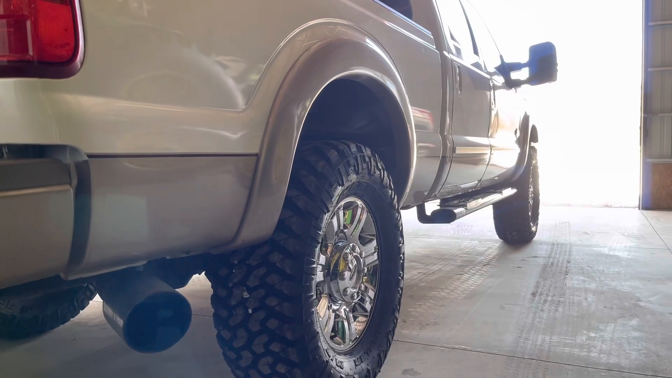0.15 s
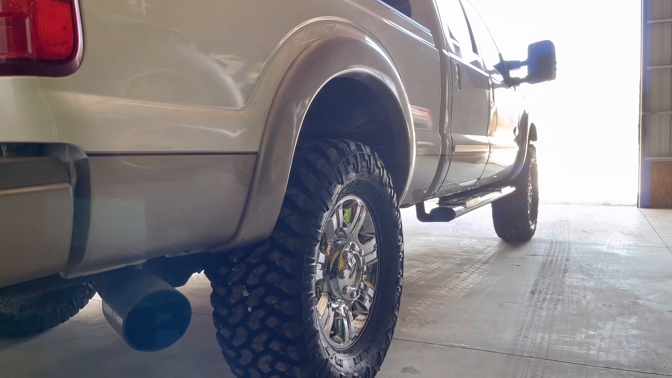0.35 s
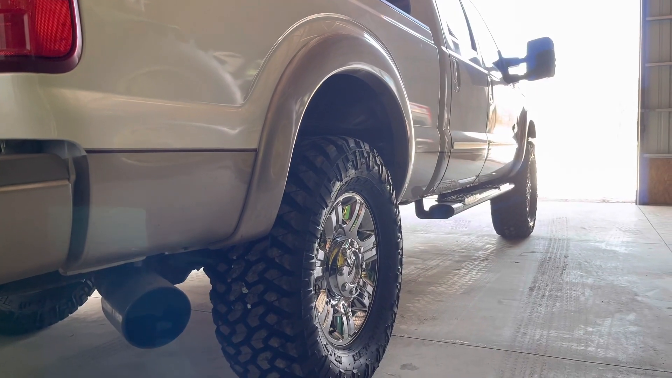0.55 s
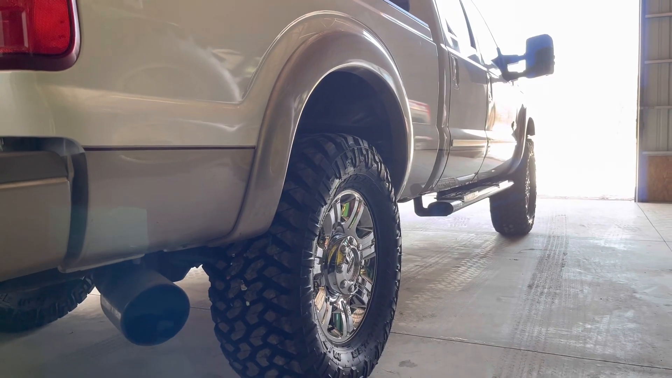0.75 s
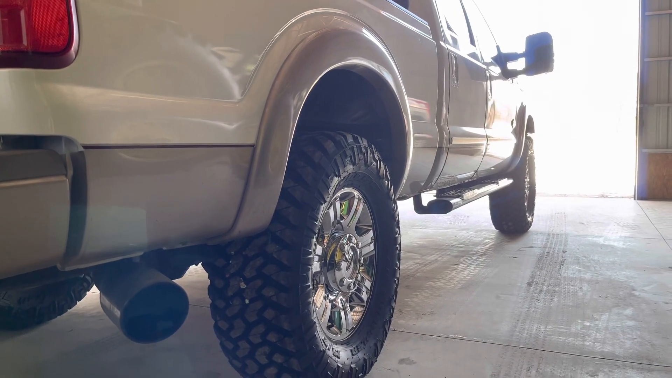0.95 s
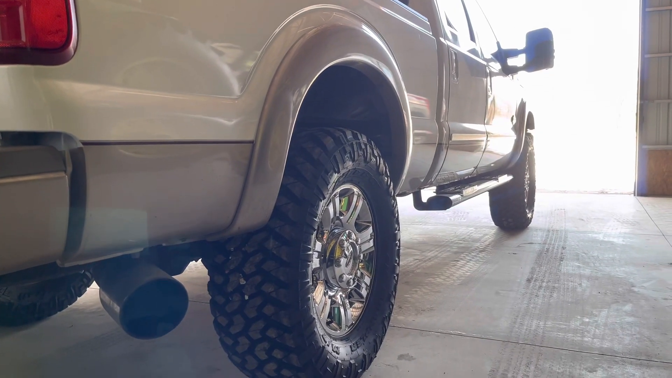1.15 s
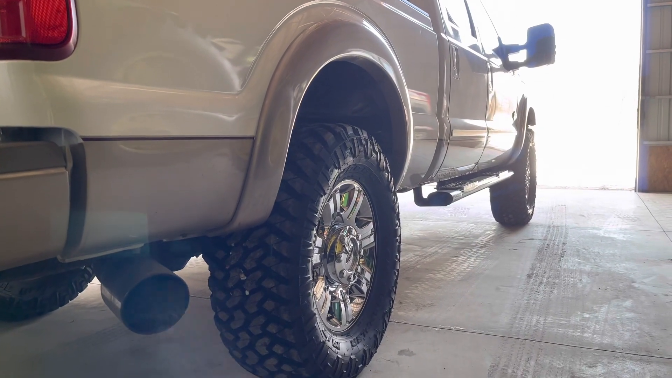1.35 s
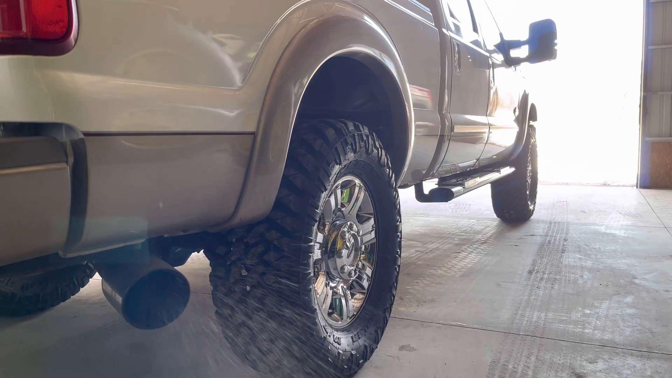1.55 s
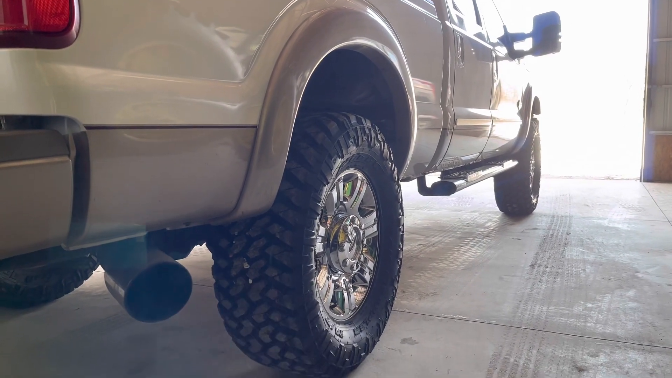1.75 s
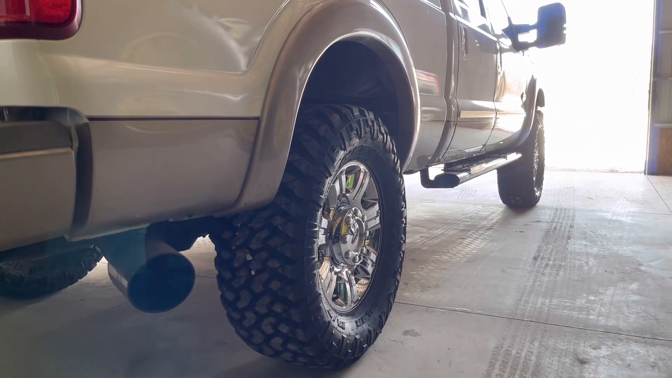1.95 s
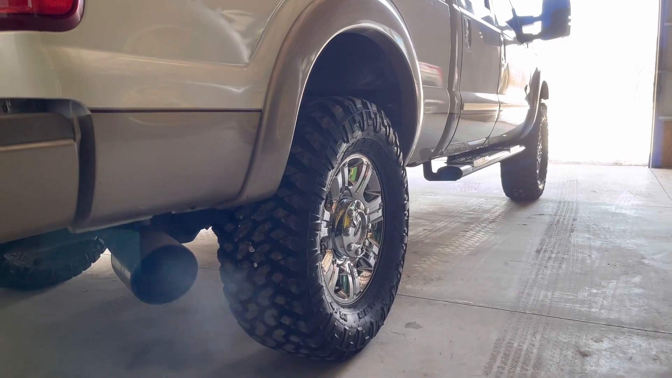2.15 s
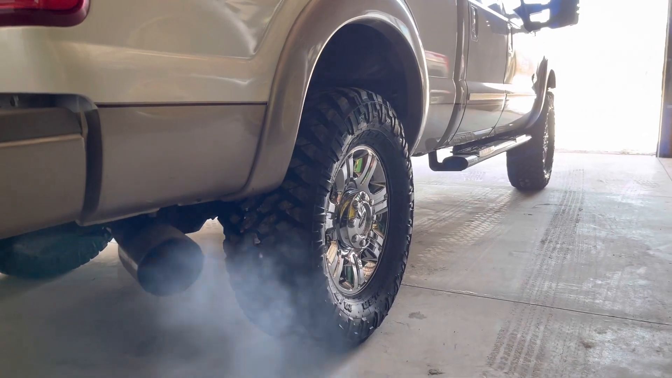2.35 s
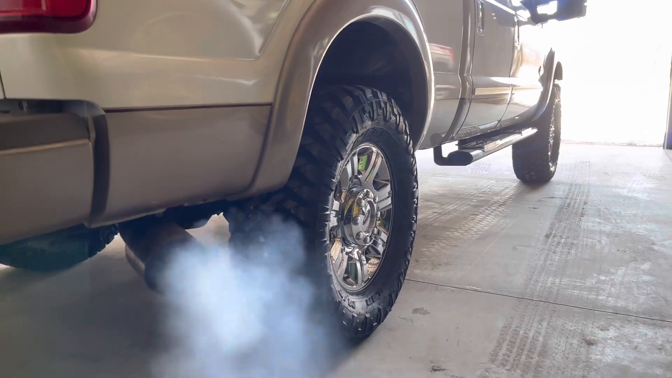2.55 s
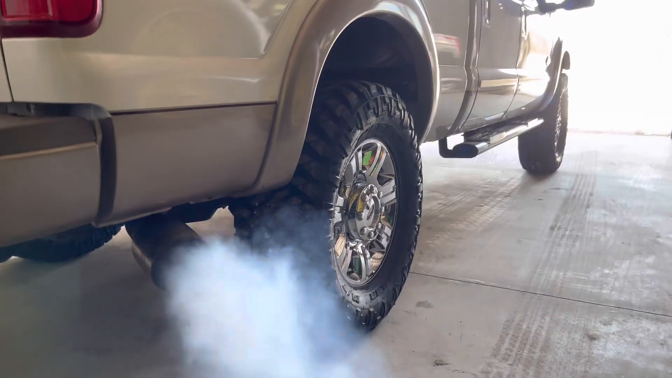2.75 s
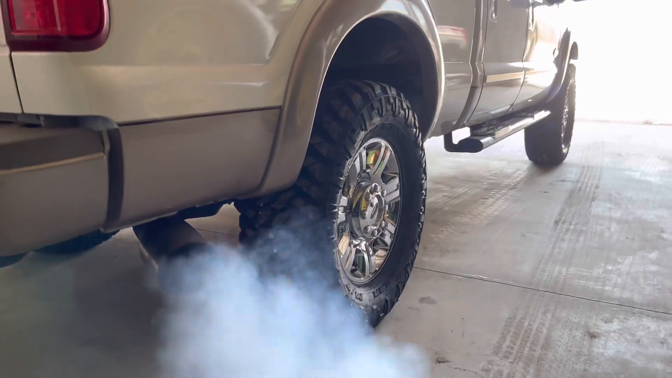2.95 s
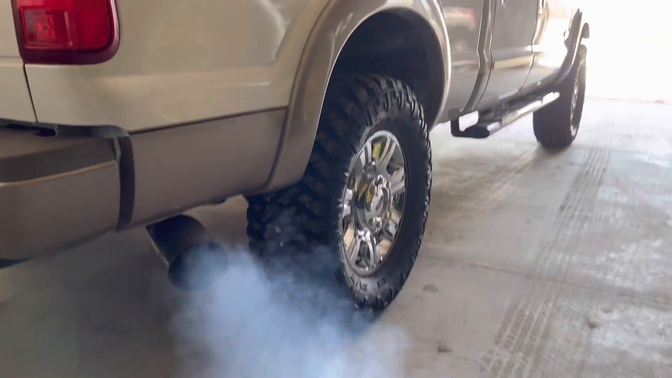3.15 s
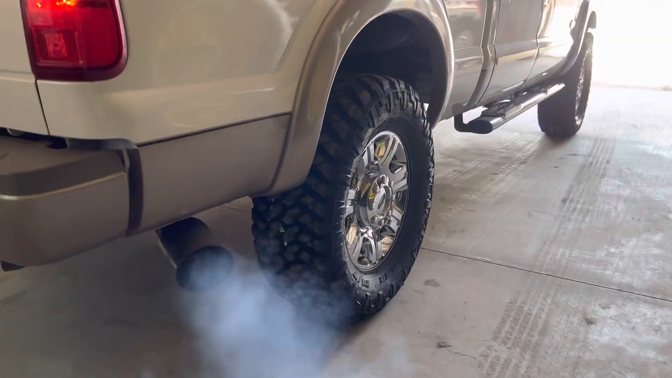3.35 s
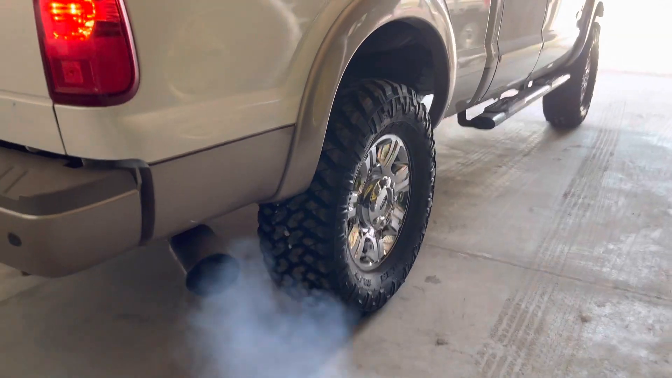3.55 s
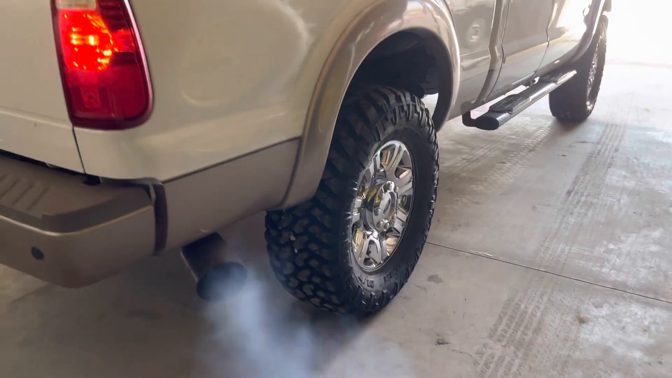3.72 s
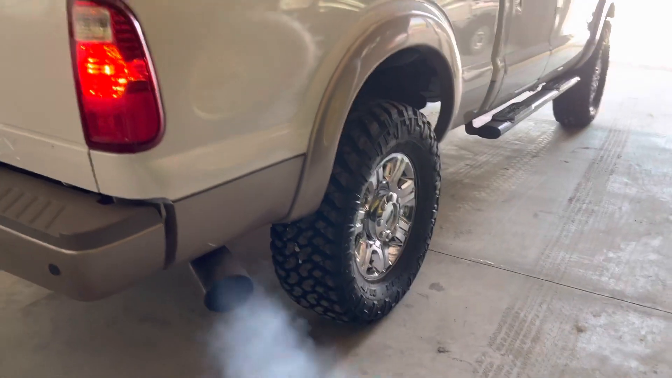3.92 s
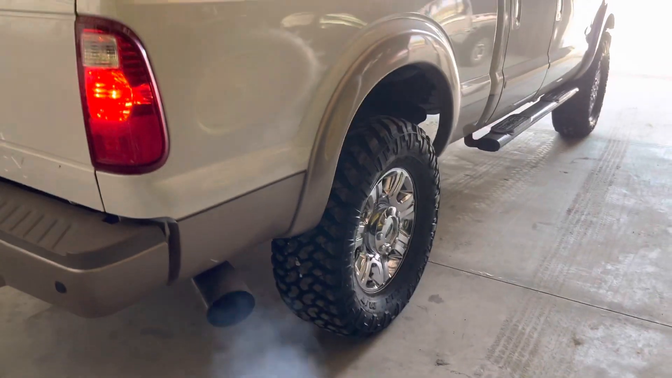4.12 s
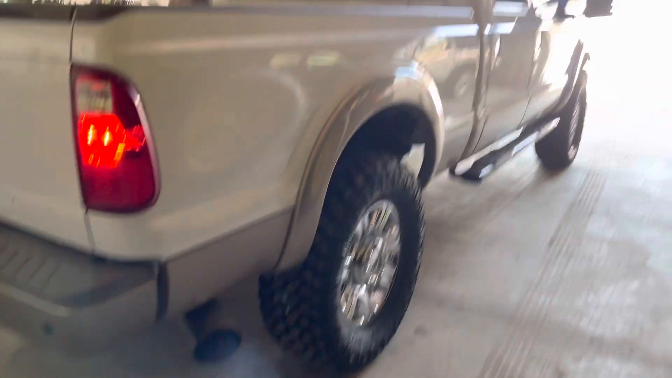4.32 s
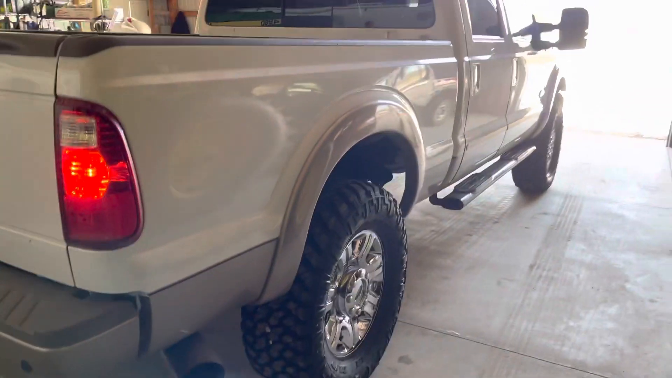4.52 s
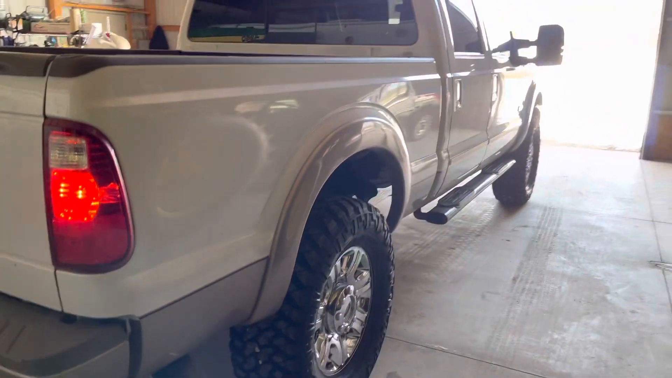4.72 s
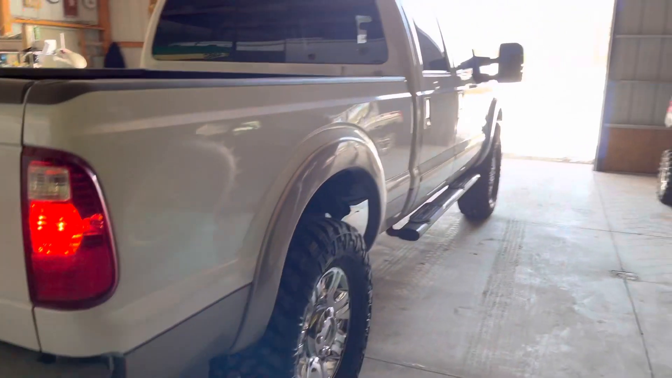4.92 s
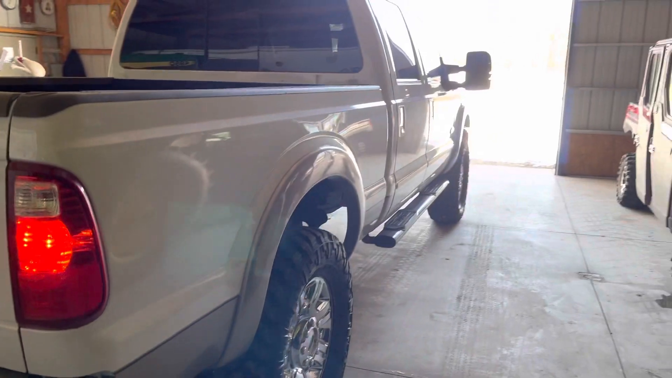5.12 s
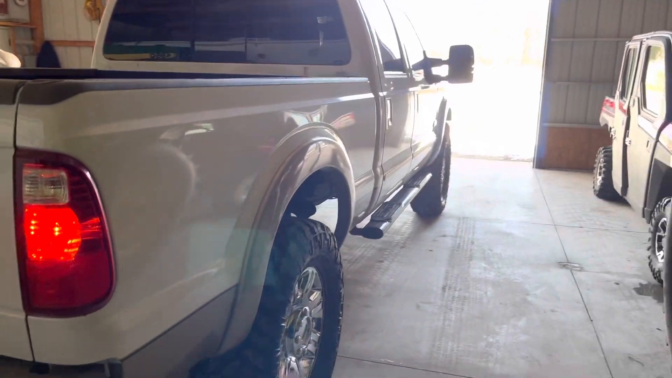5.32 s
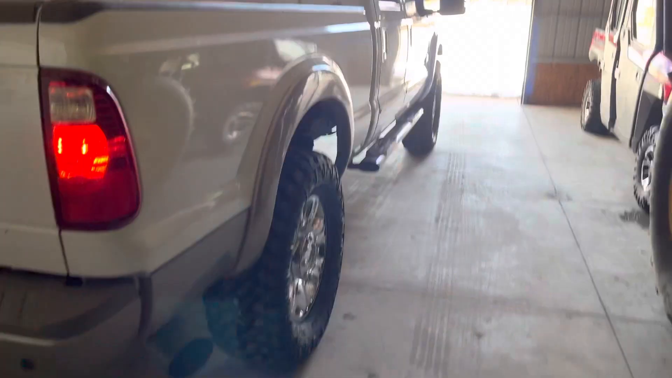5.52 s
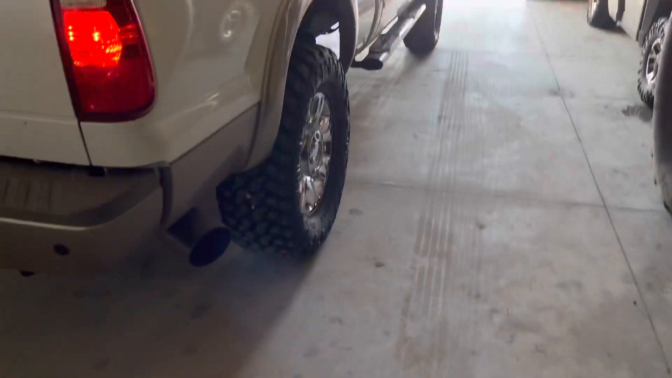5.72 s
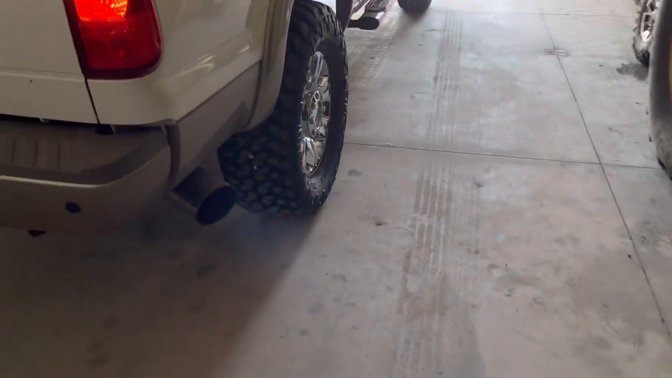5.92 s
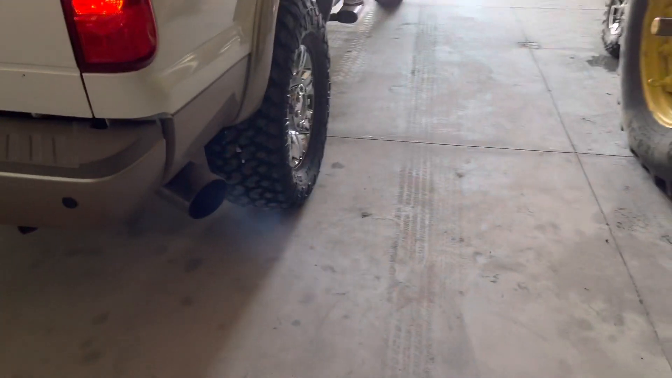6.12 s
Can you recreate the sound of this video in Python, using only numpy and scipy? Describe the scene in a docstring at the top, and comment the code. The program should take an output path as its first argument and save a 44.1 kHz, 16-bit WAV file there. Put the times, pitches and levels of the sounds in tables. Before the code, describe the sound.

A cold V8 diesel starts indoors. Quiet room rumble, a pinion clack, a gritty starter whine sagging and rising with each compression, then the engine fires unevenly, loud and barking, with sharp iron knocks. Over about two seconds the roughness fades into an even, throaty, loping idle. Microphone about a metre behind the tailpipe, with short room reverberation and slightly rounded loud peaks.

```python
"""In a shed, heard from beside its tailpipe, a cold V8 diesel pickup starts.
The starter gears, built from wavering sines and grainy noise, whine and sag at each compression; the engine
catches with hard knocks and surges once a cycle, then the fuel eases off, the chambers warm and it settles to idle.
Every firing thumps and barks through the pipe as filtered pulses and noise, knocks the block and ticks an injector;
the eight cylinders differ, so the idle lopes."""
import sys
import numpy as np
from scipy import signal
from scipy.fft import rfft, irfft, next_fast_len
from scipy.io import wavfile
from scipy.ndimage import map_coordinates

SR = 44100
rng = np.random.default_rng(int(sys.argv[2]) if len(sys.argv) > 2 else 0)


def waveform_to_disk(signal):
    """Save audio, clipped to [-1, 1], as 16-bit WAV at the path in sys.argv[1]."""
    frames = np.transpose(np.atleast_2d(signal))
    scaled = np.clip(frames, -1, 1) * 32767
    samples = np.round(scaled).astype(np.int16)
    wavfile.write(sys.argv[1], SR, samples)


N = 272097
TIME = np.arange(N) / SR
CATCH_S = 1.21  # the engine catches

# The engine stumbles, flares and settles. Each row: time in seconds, speed in firings per second.
ENGINE_SPEED = [(1.21, 43.3), (1.3, 38.3), (1.4, 46.1), (1.5, 54.8), (1.62, 52.6), (1.8, 58.6), (2.0, 56.3),
                (2.25, 56.8), (2.5, 54.8), (2.9, 53.9), (3.8, 53.56), (6.17, 53.6)]


def firings():
    """Firings counted since the engine caught; a whole number at each exhaust pulse."""
    speed = curves(ENGINE_SPEED)[0] * (TIME >= CATCH_S)
    return np.cumsum(speed) / SR - .4


# The eight cylinders in firing order. Each row: lateness in firing intervals, exhaust runner delay in seconds,
# then relative sizes of thump, bark, knock and injector tick in dB.
CYLINDERS = [(-0.01, 0.00449, 6, 1.5, 5, -5), (0.0297, 0.00536, 6, 2.5, 8, -6.5),
             (0.0187, 0.00583, 4.5, 1.5, 10, -1.5), (0.0604, 0.00573, 6, -2, 4, -6),
             (0.0046, 0.00429, 7, 0, 7, -8.5), (0.026, 0.00399, 5.5, 2, 5.5, -9.5),
             (-0.0093, 0.00612, 9, 2, 8, -0.5), (0.0686, 0.00515, 5.5, -0.5, 6, -4)]
# Tailpipe resonances. Each row: frequency in Hz, width in Hz, level in dB.
PIPE_MODES = [(88.3, 10.8, -3.5), (174.7, 8.8, 4.5), (201.2, 3.2, -9), (246, 14.3, -9.5), (339.4, 6.4, -3),
              (382, 4.1, -3), (421, 9.8, -2.5), (473, 29, -11.5)]
# Colours of the exhaust, idling and loaded. Each row: frequency in Hz, level in dB.
THUMP_IDLE = [(12, -64), (25, -25), (38, -16), (54, 1), (108, 0.5), (135, -10.5), (168, -10.5),
              (230, -15.5), (330, -50), (700, -65)]
THUMP_LOADED = [(12, -62), (25, -24), (38, -6), (56, 0), (112, 1), (140, -3.5), (170, -11), (230, -15.5),
                (330, -45), (700, -80)]
BARK_IDLE = [(30, -26), (120, -3), (190, 1), (235, -12.5), (300, -4.5), (350, -1.5), (420, -4.5),
             (490, -6.5), (580, -10), (720, -21.5), (900, -29), (1200, -66)]
BARK_LOADED = [(30, -41), (110, 6), (170, -4.5), (230, -3), (290, -8.5), (390, -2.5), (445, -0.5), (500, 0),
               (600, -11), (680, -7.5), (950, -32), (1300, -46)]
# How loud thump and bark are: level at idle in dB, added dB at full fuel, swing of the surge in dB.
THUMP_LEVEL = (-16, 4.5, 0.45)
BARK_LEVEL = (-27.5, 8.6, 1.6)
# Listening distance from the tailpipe. Each row: time in seconds, distance in metres.
DISTANCE = [(3.1, 0.98), (4.4, 1.47), (5.2, 1.27), (6.1, 1.04)]
# The warm bark swells once a cycle: loudest firing, swing in dB
LOPE_FIRING, LOPE_SWING_DB = 5.2, 1


def exhaust(turn):
    """Each pulse thumps out of the tailpipe, rings its resonances and drags a bark of turbulence behind it."""
    lateness, runner, thump_size, bark_size, _, _ = np.transpose(CYLINDERS)
    labour = load()
    thump_db = level_db(turn, *THUMP_LEVEL)
    lope_db = LOPE_SWING_DB * (1 - coldness()) * np.cos(2 * np.pi * (turn - LOPE_FIRING) / len(CYLINDERS))
    bark_db = level_db(turn, *BARK_LEVEL) + lope_db

    thump_pulses = puffs(turn, lateness, 0 * runner, thump_size, scatter_db=1.0)
    thump = -blend(thump_pulses, THUMP_IDLE, THUMP_LOADED, labour)
    ring = resonances(puffs(turn, lateness, runner, bark_size, scatter_db=3.5), PIPE_MODES)
    gas = bursts(turn, .85 * bark_size, delay=.13, rise=.16, decay=.42, between=.15, alike=.5, uneven_db=1)
    bark = blend(gas, BARK_IDLE, BARK_LOADED, coldness())

    # the thump is strongest close to the pipe
    out = amp(thump_db) * thump / curves(DISTANCE)[0]
    # more load means more turbulence and less clean ringing
    out = out + amp(bark_db - 2.9 * labour) * ring + amp(bark_db + 2.4 * labour) * bark
    return in_shed((out + booms(turn)) * onset(1.217, 0.009), wet_db=-18.5)


# Once the engine is warm, single cylinders set the pipe booming every cycle.
# Each row: firing, nominal frequency in Hz, t60 in seconds, typical peak in dB when fully warm.
BOOMS = [(0.499, 417, 0.07, -25), (2.0, 500.3, 0.073, -25.5), (2.0, 287, .07, -26),
         (4.001, 345.2, 0.29, -21.5), (4.8, 426, 0.11, -25.5), (5.9, 186, 0.18, -22.5),
         (6.1, 426, 0.049, -24)]
BOOM_RISE_S = 0.0092


def booms(turn):
    """Each boom swells and rings out once per engine cycle, never quite alike."""
    t = np.arange(SR // 4) / SR
    out = np.zeros(N + len(t))
    for firing, hz, t60, db in BOOMS:
        when = np.interp(np.arange(firing, turn[-1], len(CYLINDERS)), turn, TIME)
        swell = amp(-60 * t / t60) * (1 - np.exp(-t / BOOM_RISE_S))
        for s, (size, detune) in zip(when, rng.standard_normal((64, 2))):
            ring = np.sin(2 * np.pi * hz * (1 + .018 * detune) * t)
            out[round(s * SR):][:len(t)] += amp(db + size) * ring * swell / swell.max()
    return out[:N] * (1 - coldness())


# Colours of the block: idling, idling heard from higher up, and loaded. Each row: frequency in Hz, level in dB.
BLOCK_IDLE = [(500, -5.5), (720, -9), (880, -3.5), (1060, 4.5), (1150, 2), (1250, -57), (1480, -6.5),
              (1680, -3), (1900, -14), (2030, 1.5), (2200, -10.5), (2460, -8.5), (2800, -3), (3200, -7.5),
              (4400, -34)]
BLOCK_RAISED = [(500, 1), (720, -11), (880, 2.5), (1040, 3.5), (1150, -4), (1260, -20), (1480, -2.5),
                (1680, -11), (1890, 5.5), (2000, -7.5), (2160, -15.5), (2400, -2.5), (2800, -9),
                (3200, -10.5), (4400, -29)]
BLOCK_LOADED = [(500, -15), (750, 6.5), (1000, -0.5), (1220, -6.5), (1400, 3.5), (1600, -17.5), (1800, 7),
                (2000, -2), (2200, -3.5), (2420, 7), (2750, 2), (3150, -7.5), (4400, -36)]
# Ringing of the block and its covers. Each row: frequency in Hz, width in Hz, level in dB.
IRON_MODES = [(940, 124, -0.5), (1059, 52, 5), (1974, 110, -4), (2144, 14, -1.5)]
# Colour of the injector ticks. Each row: frequency in Hz, level in dB.
CLATTER = [(2000, -5.5), (3000, -16), (3700, -1), (5000, 0), (7000, 3.5), (8700, 7.5), (10000, 0.5),
           (12000, -15), (15000, -53)]
# The valve covers ring with the ticks. Each row: frequency in Hz, width in Hz, level in dB.
COVER_MODES = [(3504, 144, 0.5), (6380, 160, -1)]
# Colour of one valve lifter's click. Each row: frequency in Hz, level in dB.
LIFTER = [(2500, -48), (3300, 3), (3750, 7.5), (4400, 3.5), (5200, -35), (6800, -6), (9000, 16),
          (14000, -79)]
# How loud knock and tick are: level at idle in dB, added dB at full fuel, swing of the surge in dB.
KNOCK_LEVEL = (-36.5, 4.5, 1.5)
TICK_LEVEL = (-34.5, 9.5, 4.1)
# The lifter's click: firing, decay in firing intervals, level
LIFTER_FIRING, LIFTER_DECAY, LIFTER_DB = 6.47, .15, -43.5
# The listening point is lifted away from the pipe: when, how long
LIFT_AT_S, LIFT_S = 3.47, 1


def block(turn):
    """Combustion knocks the iron block; the injectors tick just after, and one lifter clicks once a cycle."""
    lateness, runner, _, _, knock_size, tick_size = np.transpose(CYLINDERS)
    labour = load()
    knock_db, tick_db = level_db(turn, *KNOCK_LEVEL), level_db(turn, *TICK_LEVEL)
    raised = onset(LIFT_AT_S, LIFT_S)
    running = onset(1.217, 0.0061)

    blows = bursts(turn, knock_size, delay=0.179, rise=0.097, decay=0.41, between=0.4, alike=0.17, uneven_db=1.3)
    idling = blend(blows, BLOCK_IDLE, BLOCK_RAISED, raised)
    rattle = unit((1 - labour) * idling + labour * coloured(blows, BLOCK_LOADED))
    ping_pulses = puffs(turn, lateness + .32, 0 * runner, 0.42 * knock_size, scatter_db=2.4)
    pings = resonances(ping_pulses, IRON_MODES)
    knock = amp(knock_db) * rattle + amp(knock_db - 7 - 17 * labour) * pings

    clicks = bursts(turn, 0.82 * tick_size, delay=.35, rise=0.18, decay=0.33, between=.6, alike=.25, uneven_db=1.5)
    # the covers ring only as the listening point rises
    ticks = coloured(clicks, CLATTER) + amp(-14) * resonances(clicks, COVER_MODES) * raised

    age = (turn - LIFTER_FIRING) % len(CYLINDERS)
    lifter_noise = rng.standard_normal(N) * age * np.exp(-age / LIFTER_DECAY)
    # the lifter is heard only once the idle has settled
    lifter = coloured(lifter_noise, LIFTER) * onset(3.0, 1.0)
    top_end = amp(tick_db) * ticks * running + amp(LIFTER_DB) * lifter
    return in_shed(knock * running, wet_db=-8) + in_shed(top_end, wet_db=-18)


# The hardest combustion knocks. Each row: time in seconds, ring of the block in dB, treble crack in dB.
HARD_KNOCKS = [(1.253, -9, -17.5), (1.283, -17, -21), (1.302, -21, -19.5), (1.326, -16, -22),
               (1.354, -13.5, -20.5), (1.4167, -14, -24), (1.4364, -26, -23.5), (1.457, -13.5, -20),
               (1.475, -24, -26), (1.4931, -16.5, -22.5), (1.5144, -24, -26), (1.6086, -20, -29),
               (1.6257, -22, -32), (1.648, -23, -25.5), (1.72, -14, -23), (1.7531, -15.5, -21),
               (1.7706, -22, -28), (1.7864, -24, -27), (1.818, -13.5, -21), (1.8901, -20, -31),
               (1.9593, -19, -26), (2.0304, -18, -25), (2.0491, -20, -30), (2.1191, -19, -25.5),
               (2.1388, -20, -33), (2.173, -24, -31), (2.2423, -17.5, -36), (2.3155, -17.5, -29),
               (2.459, -22.5, -38), (2.5685, -24, -38), (2.7142, -21.5, -43), (4.093, -35, -48)]
# Late burns bang in the pipe. Each row: time in seconds, level in dB.
BANGS = [(1.221, -6.5), (1.254, -7), (1.280, -17), (1.300, -2.5), (1.417, 0), (1.492, -9), (1.718, -8),
         (1.785, -7), (1.854, -11.5), (2.065, -22), (2.136, -10), (2.278, -18), (2.349, -20), (2.421, -16),
         (2.568, -11)]
# What a hard knock rings in the block and a bang in the pipe. Each row: frequency in Hz, width in Hz, level in dB.
KNOCK_MODES = [(1730, 210, 0), (2430, 74, 3), (2570, 62, -1)]
BANG_MODES = [(424, 155, 2), (652, 160, 1.5)]
CRACK_T60_S, BANG_T60_S = 0.094, 0.055


def hard_knocks():
    """Pooled fuel lights all at once: the block rings and cracks, and late burns bang in the pipe."""
    when, ring_db, crack_db = np.transpose(HARD_KNOCKS)
    knock, iron = struck(when, ring_db, CRACK_T60_S, KNOCK_MODES, ring_db=-10)
    crack, covers = struck(when, crack_db, CRACK_T60_S, COVER_MODES, ring_db=-10)
    bang, pipe = struck(*np.transpose(BANGS), BANG_T60_S, BANG_MODES, ring_db=-3.5)
    thud = amp(-7) * np.std(knock) * coloured(knock, BLOCK_LOADED)
    treble = amp(5.5) * np.std(crack) * coloured(crack, CLATTER)
    blast = amp(-3) * np.std(bang) * coloured(bang, BARK_LOADED)
    return in_shed(iron + covers + thud + treble, wet_db=-6) + in_shed(pipe + blast, wet_db=-12)


def struck(times, levels_db, t60, modes, ring_db):
    """Each blow is a noise burst that dies away plus a ring of the modes, ring_db above the bursts' rms."""
    t = np.arange(SR // 5) / SR
    hits = np.bincount(np.round(times * SR).astype(int), amp(levels_db), N)
    shape = amp(-60 * t / t60) * (1 - np.exp(-t / 0.0016))
    burst = signal.fftconvolve(hits, shape)[:N] * rng.standard_normal(N)
    return burst, amp(ring_db) * np.std(burst) * resonances(hits, modes)


# Fuel: the governor holds full starting fuel after the catch, then eases it off
FUEL_HOLD_S, FUEL_EASE_S = 0.53, 0.99
# Cold: the chambers stay cold for a while after the catch, then warm
COLD_HOLD_S, WARMING_S = 1.26, 1.08
# Surge: at first only part of the firing order burns well; strongest firing, how long, fade
SURGE_FIRING, SURGE_HOLD_S, SURGE_FADE_S = 3.23, 0.61, 0.14


def fuel():
    """Fuel above the idle dose, 0-1."""
    return np.exp(-np.maximum(TIME - CATCH_S - FUEL_HOLD_S, 0) / FUEL_EASE_S)


def coldness():
    """Ignition delay of the cold chambers, 0-1."""
    return 1 - onset(CATCH_S + COLD_HOLD_S, WARMING_S)


def load():
    """How hard the engine labours, 0-1: fuel and cold in equal parts."""
    return (fuel() + coldness()) / 2


def level_db(turn, idle_db, fuel_db, surge_db):
    """A layer grows with the fuel and surges once a cycle until all the cylinders burn."""
    patchy = np.exp(-np.maximum(TIME - CATCH_S - SURGE_HOLD_S, 0) / SURGE_FADE_S)
    surge = patchy * np.cos(2 * np.pi * (turn - SURGE_FIRING) / len(CYLINDERS))
    return idle_db + fuel_db * fuel() + surge_db * surge


def bursts(turn, cylinder_db, delay, rise, decay, between, alike, uneven_db):
    """A noise burst per firing (times in firing intervals); the share alike recurs when its cylinder fires again."""
    count, age = np.divmod(turn - delay, 1)
    firing = count.astype(int)
    cylinder = firing % len(CYLINDERS)
    since = np.arange(N) - np.searchsorted(count, count)  # samples since this burst began
    own = rng.standard_normal((len(CYLINDERS), SR))[cylinder, since % SR]
    alike = np.clip(alike, 0, 1)
    noise = np.sqrt(alike) * own + np.sqrt(1 - alike) * rng.standard_normal(N)
    # cold cylinders burn unevenly under load
    scatter = rng.standard_normal(size=512)[firing] * uneven_db * (.5 + load())
    shape = (1 - np.exp(-age / rise)) * np.exp(-age / decay)
    return noise * (between + unit(shape) * amp(cylinder_db[cylinder] + scatter))


def puffs(turn, lateness, delay, cylinder_db, scatter_db):
    """One pressure pulse per firing, timed and sized by its cylinder."""
    count = np.arange(int(turn[-1]) + 1)
    cylinder = count % len(CYLINDERS)
    when = np.interp(count + lateness[cylinder], turn, TIME) + delay[cylinder]
    size = amp(cylinder_db[cylinder] + scatter_db * rng.standard_normal(len(count)))
    return np.bincount(np.round(when * SR).astype(int), size, N)[:N]


# The starter runs up, sags at each compression and sings out as it recovers.
# Each row: time in seconds, teeth per second, strain in dB (in full on the whine, in part on the rasp).
CRANK = [(.541, 700, -9), (.605, 975, 1), (.635, 1020, -1), (.665, 1160, 3), (.695, 1180, 5),
         (.72, 1090, 2), (.745, 950, 5), (.78, 935, 1), (.8, 1200, -1), (.815, 1340, 4), (.845, 1240, 2),
         (.885, 1070, 0), (.905, 1400, 4), (.925, 1410, 5), (.945, 1260, 3), (.985, 1130, -2),
         (1.025, 1500, 2), (1.055, 1410, 4), (1.095, 1350, -2), (1.125, 1610, 2), (1.21, 1680, -5)]
# Mesh harmonics and sidebands of the commutator. Each row: multiple of the tooth rate, level in dB.
TEETH = [(.78, -2), (1, 4), (1.17, -7), (1.68, -5), (2, 3), (2.3, -8), (3, -5), (4, -10), (5, -8)]
# Colour of the starter gears. Each row: frequency in Hz, level in dB.
GEARCASE = [(60, -28), (200, -1), (350, 10), (600, 0.5), (1000, 5.5), (1450, 2), (1720, -1), (2250, 0),
            (3000, 4), (3500, 1), (4150, -5), (4800, -5.5), (7000, 3.5), (9000, 1), (14000, -33)]
# The housing sings when a gear partial sweeps past. Each row: frequency in Hz, width in Hz, level in dB.
HOUSING_MODES = [(937, 29, -7), (1207, 31, 13.5), (1401, 11, 13.5), (1970, 47, 15.5), (2300, 61, 8.5),
                 (2740, 55, -1), (2960, 35, -1)]
# The freed armature whistles upward in snatches. Each row: time in seconds, frequency in Hz, level in dB.
ARMATURE = [(.98, 3800, -60), (1.02, 4080, -34), (1.06, 3980, -44), (1.1, 4220, -34), (1.165, 4300, -34),
            (1.22, 4500, -46)]
# The pinion clacks in, then clashes as the engine kicks against it.
# Each row: time in seconds, level in dB, t60 in seconds.
CLASHES = [(0.539, -21, 0.28), (1.023, -24, 0.12), (1.119, -19, 0.057)]
# Colour of the pinion's clash. Each row: frequency in Hz, level in dB.
PINION = [(150, -23), (400, 1), (1750, -8), (2250, 6.5), (3500, -3), (4100, 3), (4600, -10), (7000, -2),
          (14000, -24)]
SOLENOID_S = .541  # the starter engages
WHINE_DB, RASP_DB = -28, -27


def starter():
    """The pinion clacks in, whines and rasps on the ring gear until the engine runs away from it."""
    rate, strain_db = curves(CRANK)
    teeth = np.cumsum(rate * (1 + .009 * wobble(280))) / SR
    strands = 0
    for multiple, db in TEETH:
        partial = np.sin(2 * np.pi * multiple * teeth + .35 * wobble(200))
        strands = strands + amp(db) * partial * amp(2.6 * wobble(110))
    strands = strands * engaged()
    mesh = unit(coloured(strands, GEARCASE) + .7 * resonances(strands, HOUSING_MODES))
    # rms 1 while in mesh, not over the whole scene
    mesh = mesh * np.sqrt(np.mean(engaged() ** 2))
    whine = amp(WHINE_DB + strain_db) * mesh * onset(0.51, 0.053)

    spin, spin_db = curves(ARMATURE)
    spin_phase = 2 * np.pi * np.cumsum(spin) / SR + 1.1 * wobble(380)
    whistle = amp(spin_db + 3 * wobble(40)) * np.sin(spin_phase)

    # the teeth bite unevenly, so the rasp is grainy, and it rings the housing too
    grit = rng.standard_normal(N) * amp(3.5 * wobble(200))
    scrape = coloured(grit, GEARCASE) + amp(-18) * resonances(grit, HOUSING_MODES)
    rasp = amp(RASP_DB + 0.4 * strain_db) * scrape

    clash_gain = sum(amp(db - 60 * np.abs(TIME - s) / t60) * (TIME >= s) for s, db, t60 in CLASHES)
    clash = clash_gain * coloured(rng.standard_normal(N), PINION)
    return in_shed((whine + whistle + rasp + clash) * engaged(), wet_db=-6)


def engaged():
    """1 while the pinion is in mesh, fading as it lets go."""
    return onset(SOLENOID_S - .001, 0.006) * (1 - onset(1.153, 0.27))


# Colour of the pumped air. Each row: frequency in Hz, level in dB.
PUMPING = [(20, -37), (40, -4), (52, -1), (66, 2), (95, -14), (200, -18), (500, -47)]
# Compressions while cranking. Each row: time in seconds, puff from the pipe in dB.
COMPRESSIONS = [(0.75, -16), (0.856, -15), (0.956, -25), (1.05, -24), (1.148, -35)]
# A cylinder half fires just before the catch: time in seconds, puff in dB.
COUGH = (1.185, -14.5)
PUMPING_DB, PUFF_HZ, PUFF_S = -30, 65, 0.012


def pumping():
    """The unfired cylinders pump air down the pipe: a puff for each compression, then a cough."""
    air = coloured(rng.standard_normal(N), PUMPING) * onset(0.555, 0.012) * engaged()
    return amp(PUMPING_DB) * air + sum(puff(s, db) for s, db in COMPRESSIONS) + puff(*COUGH)


def puff(s, db):
    """One soft push of air out of the tailpipe."""
    return -amp(db) * bell(s, PUFF_S) * np.cos(2 * np.pi * PUFF_HZ * (TIME - s))


# Colour of the quiet shed. Each row: frequency in Hz, level in dB.
QUIET = [(25, -9), (52, 3), (100, -12.5), (160, -17), (255, -17), (350, -27), (520, -29.5), (800, -42),
         (1750, -34.5), (3300, -54), (4500, -49), (6500, -39), (12000, -57)]


def background():
    """Low rumble of the shed as coloured noise, and the fuel pump humming before the start."""
    hum = np.sin(2 * np.pi * 474 * TIME + .2 * wobble(13))
    pump = amp(-62.5) * hum * (1 - onset(0.45, .08))
    rumble = amp(-47.5) * coloured(rng.standard_normal(N), QUIET)
    return in_shed(rumble, wet_db=-4.0) + pump


# How long the shed rings. Each row: frequency in Hz, t60 in seconds.
SHED = [(100, 0.13), (1000, 0.92), (4000, 0.46), (9000, 0.0026), (11500, 0.0066)]


def in_shed(x, wet_db):
    """The direct sound plus the walls' answer, which differs in each channel; the power is roughly kept."""
    hz, t, z = signal.stft(rng.standard_normal((2, SR // 2)), SR, nperseg=256)
    decay = amp(-60 * t / along(SHED, hz)[:, None])
    tail = signal.istft(z * decay, SR, nperseg=256)[1]
    echo = signal.fftconvolve(x[None], tail / np.linalg.norm(tail[0]), axes=1)[:, :N]
    return (x + amp(wet_db) * echo) / np.hypot(1, amp(wet_db))


def amp(db):
    """Decibels to gain."""
    return 10 ** (np.asarray(db) / 20)


def unit(x):
    """Scaled to rms 1."""
    return x / np.sqrt(np.mean(x ** 2) + 1e-20)


def along(points, hz):
    """(Hz, value) points on a log axis."""
    f, v = np.transpose(points)
    return np.interp(np.log(hz + 1), np.log(f + 1), v)


def curves(rows):
    """One value per sample for each column after the time."""
    s, *cols = np.transpose(rows)
    return [np.interp(TIME, s, c) for c in cols]


def onset(start, rise):
    """A ramp from 0 to 1."""
    return np.clip((TIME - start) / rise, 0, 1)


def bell(centre, width):
    """A smooth swell of height 1."""
    return np.exp(-((TIME - centre) / width) ** 2)


def wobble(rate):
    """A smooth random curve, rate knots a second."""
    return map_coordinates(rng.standard_normal(int(N * rate / SR) + 4), [TIME * rate])


def filtered(x, response):
    """x times a complex response of frequency."""
    m = next_fast_len(N + SR // 2)
    return irfft(rfft(x, m) * response(np.fft.rfftfreq(m, 1 / SR)), m)[..., :N]


def coloured(x, spectrum):
    """x through a (Hz, dB) spectrum, at rms 1."""
    return unit(filtered(x, lambda hz: amp(along(spectrum, hz))))


def blend(x, idle, loaded, share):
    """The colour shifts from the first spectrum to the second as share goes from 0 to 1."""
    share = np.clip(share, 0, 1)
    return unit((1 - share) * coloured(x, idle) + share * coloured(x, loaded))


def resonances(x, modes):
    """x through (Hz, width Hz, dB) resonances of alternating sign, dull above the last, at rms 1."""
    def response(f):
        total = 0
        for k, (hz, width, db) in enumerate(modes):
            total = total + (-1) ** k * amp(db) * 1j * f * width / (hz * hz - f * f + 1j * f * width)
        return total / (1 + 1j * f / (2 * modes[-1][0])) ** 2
    return unit(filtered(x, response))


def scene():
    """Exhaust, block and starter, with the pumped air and the quiet shed."""
    turn = firings()
    engine = exhaust(turn) + block(turn) + hard_knocks()
    return engine + starter() + pumping() + background()


# Overall treble colour, with dips near 8 and 10.8 kHz. Each row: frequency in Hz, level in dB.
TREBLE_COLOUR = [(7100, -0.5), (7800, -13), (8600, -11.5), (10000, -7), (10850, -14), (11800, 8.5),
                 (13000, 10), (14400, -18)]
# Phase between the channels. Each row: frequency in Hz, lead of the left in radians.
STEREO_LEAD = [(100, 0), (700, .15), (1120, .45), (1550, .9), (1850, .4), (3100, 1.3), (4480, .7),
               (5700, -1.2), (6700, -1.4), (8200, -3.14), (9400, -4.4), (10500, -6.28)]
# Level between the channels. Each row: frequency in Hz, left minus right in dB.
STEREO_TILT = [(200, -1.4), (370, -.3), (680, -1.2), (1200, -.8), (2300, .2), (4250, 3.2), (7800, .3)]
TOP_HZ = 14400


def record(dry):
    """The treble is coloured, the channels differ in phase and level, peaks are rounded and the band is limited."""
    sides = np.array([[.5], [-.5]])  # half of each difference to either side

    def stereo_response(hz):
        gain = amp(along(TREBLE_COLOUR, hz) + sides * along(STEREO_TILT, hz))
        return gain * np.exp(1j * sides * along(STEREO_LEAD, hz))
    stereo = filtered(dry, stereo_response)
    rounded = stereo / (1 + np.abs(stereo / .97) ** 6) ** (1 / 6)
    return filtered(rounded, lambda hz: hz < TOP_HZ)


dry = scene()
out = record(dry)
waveform_to_disk(out)
```